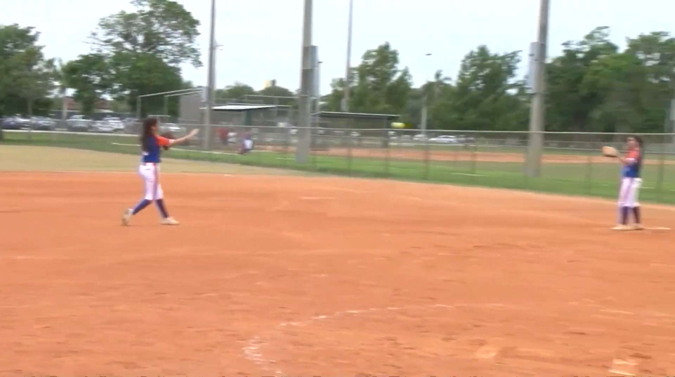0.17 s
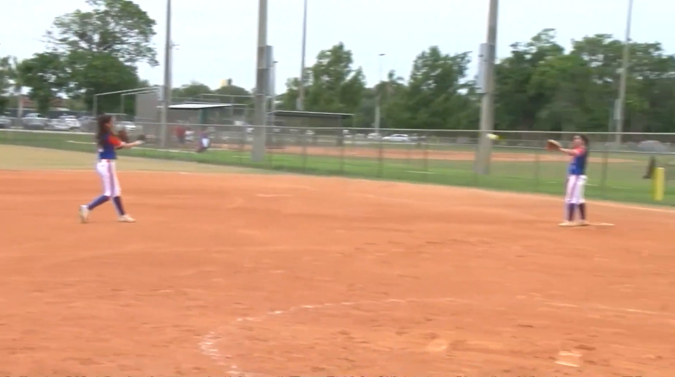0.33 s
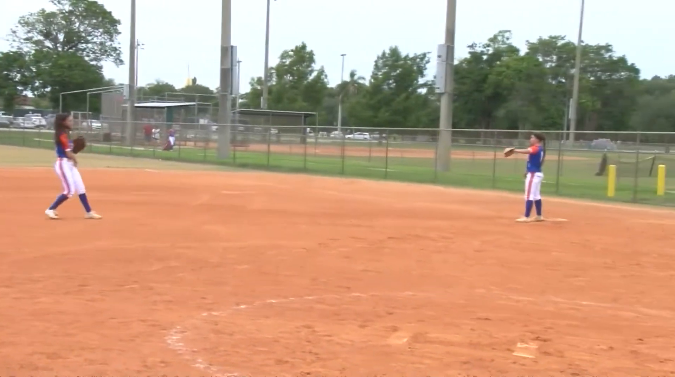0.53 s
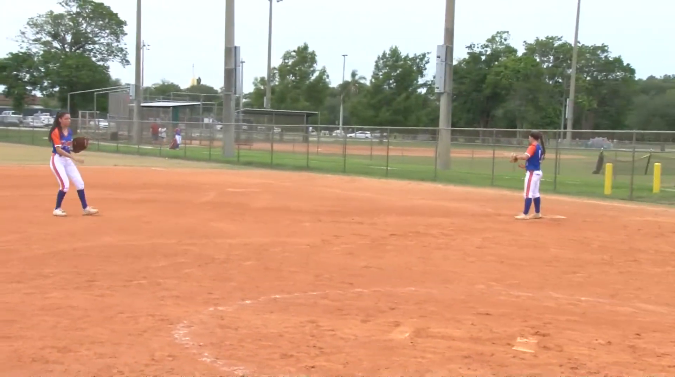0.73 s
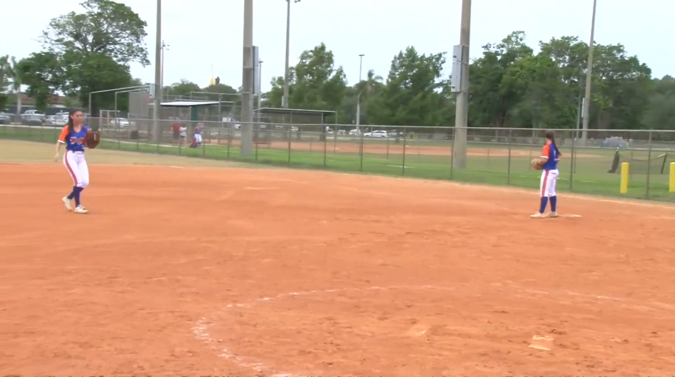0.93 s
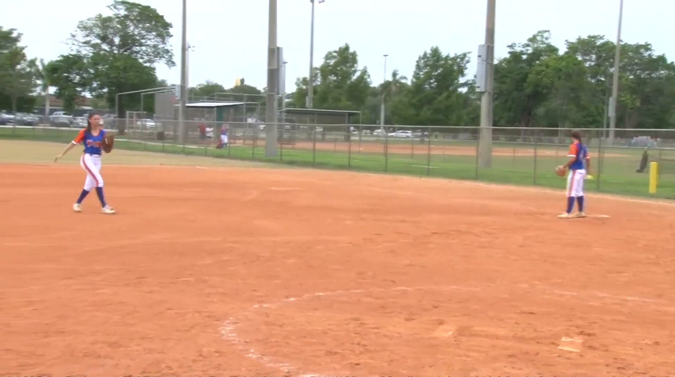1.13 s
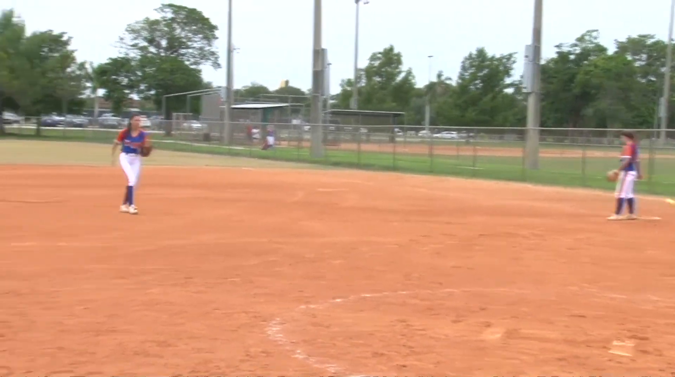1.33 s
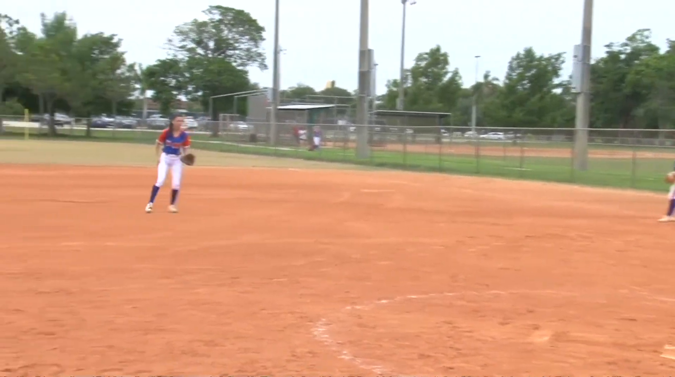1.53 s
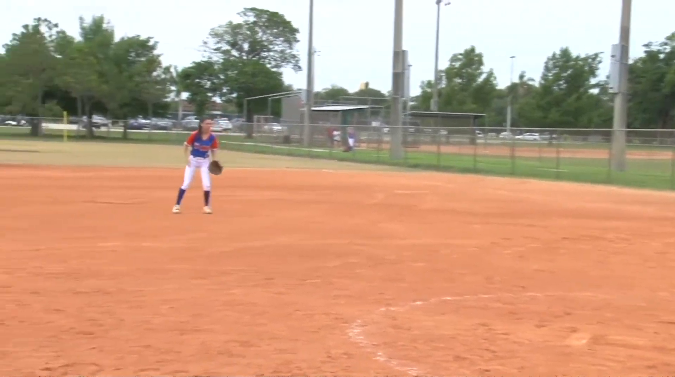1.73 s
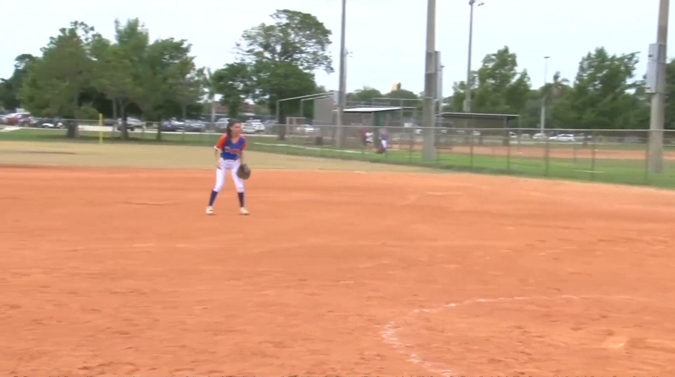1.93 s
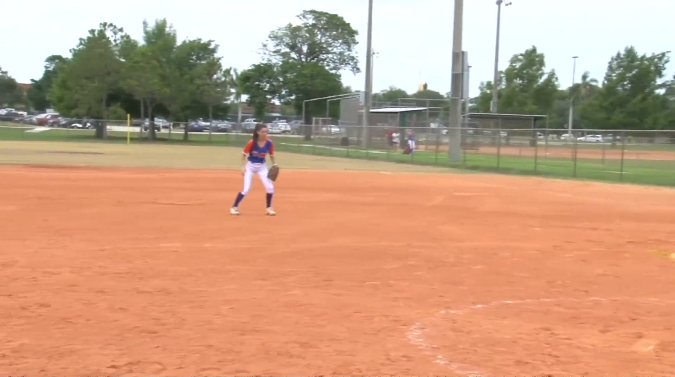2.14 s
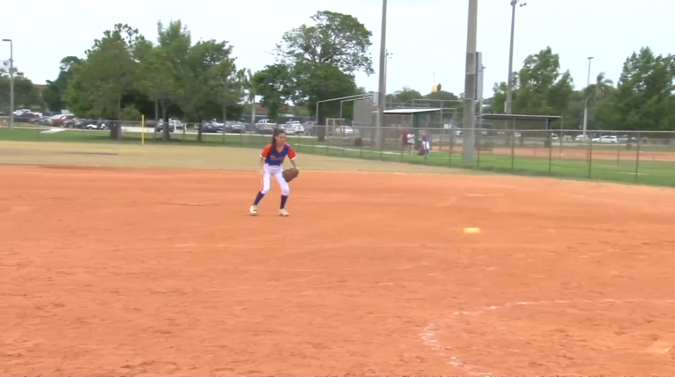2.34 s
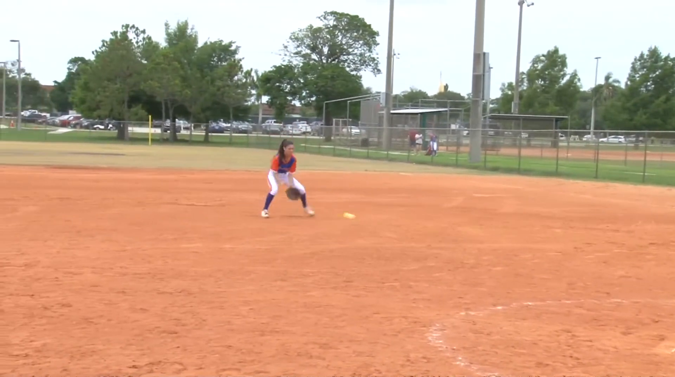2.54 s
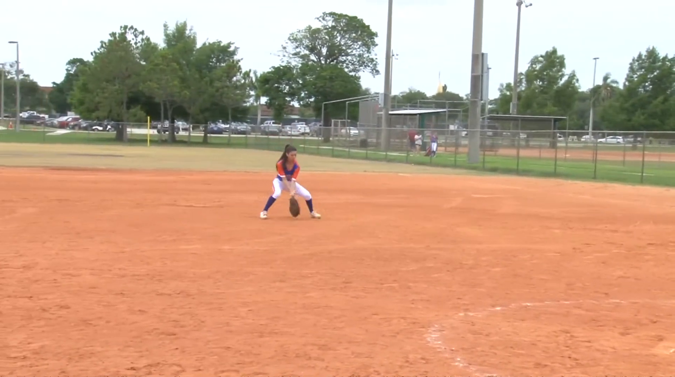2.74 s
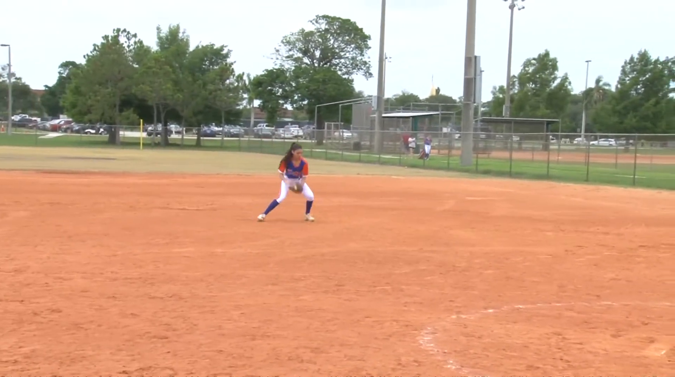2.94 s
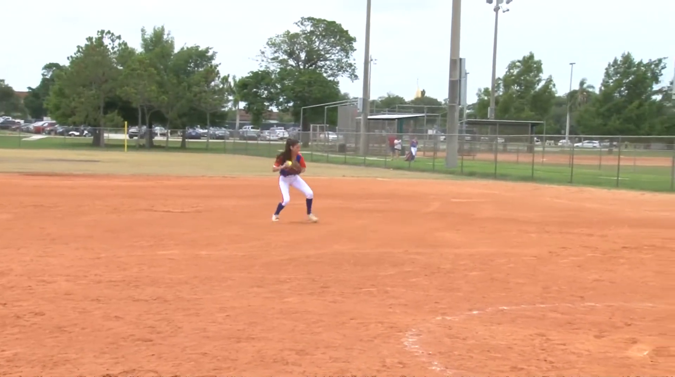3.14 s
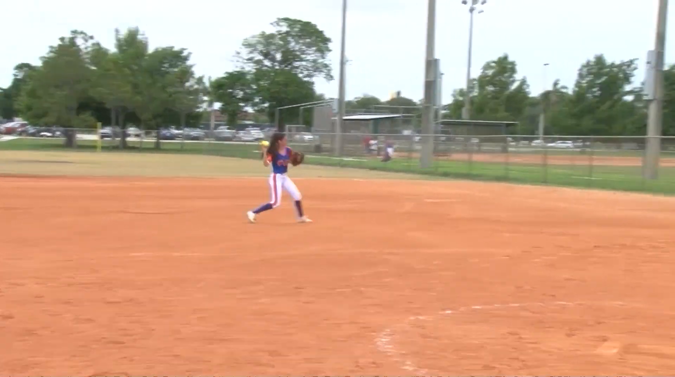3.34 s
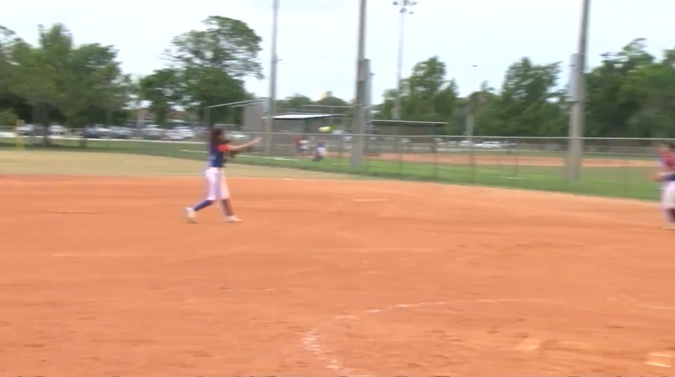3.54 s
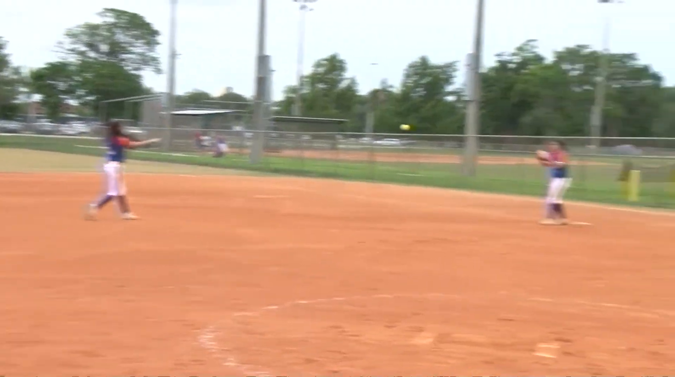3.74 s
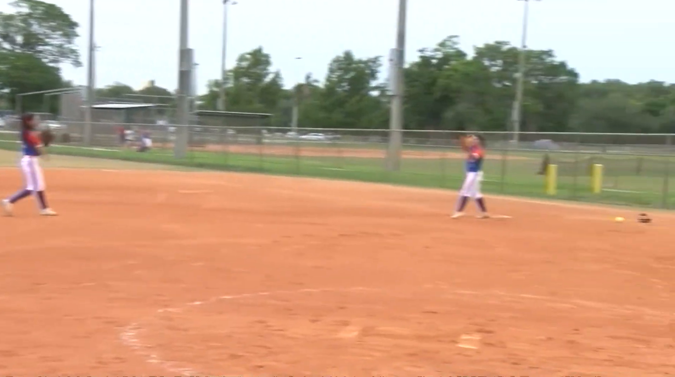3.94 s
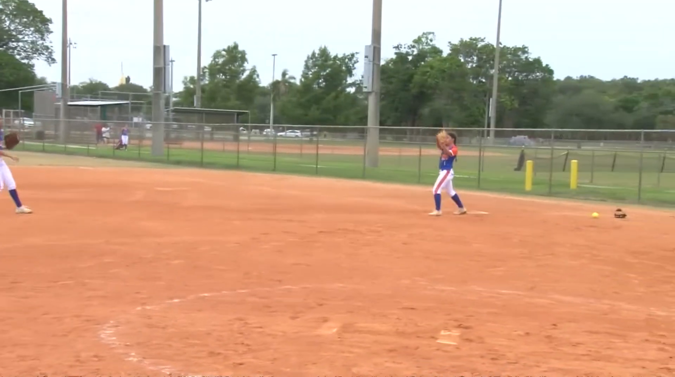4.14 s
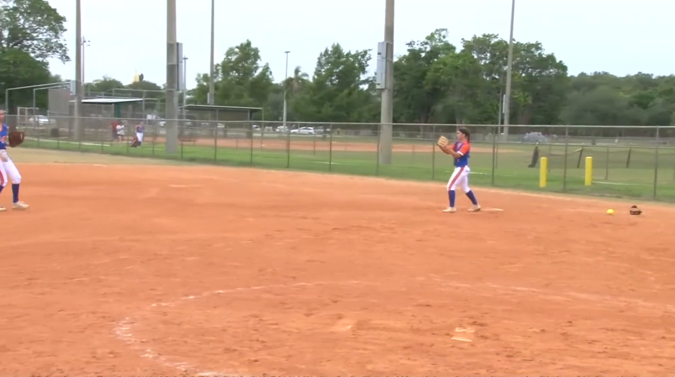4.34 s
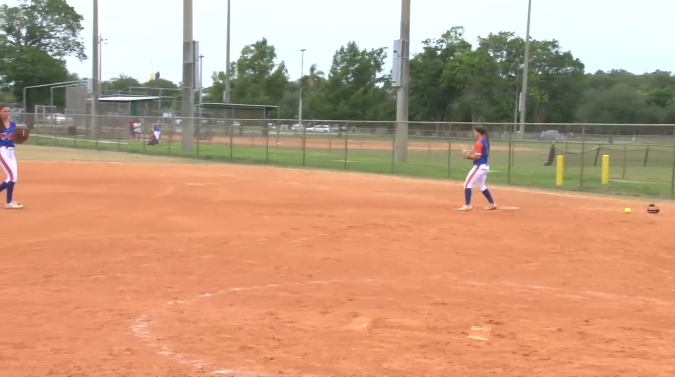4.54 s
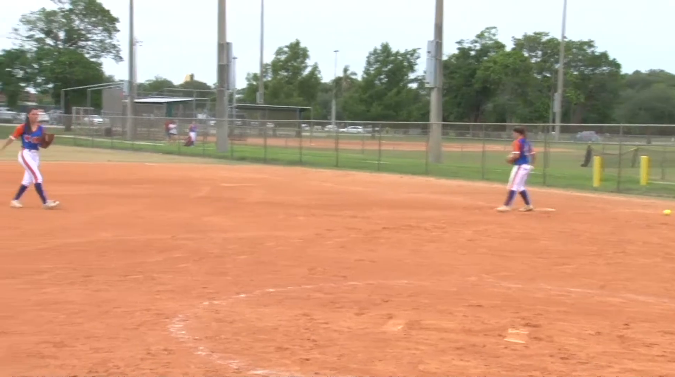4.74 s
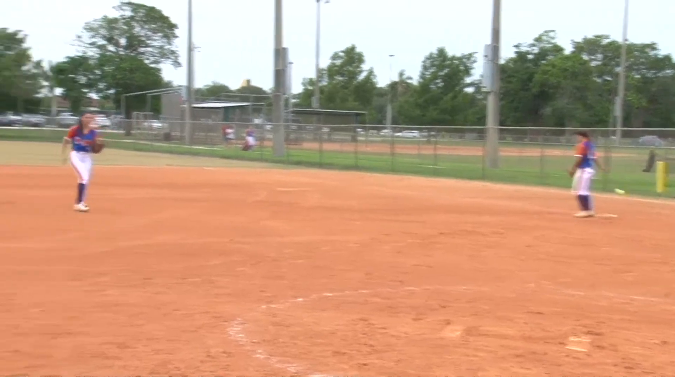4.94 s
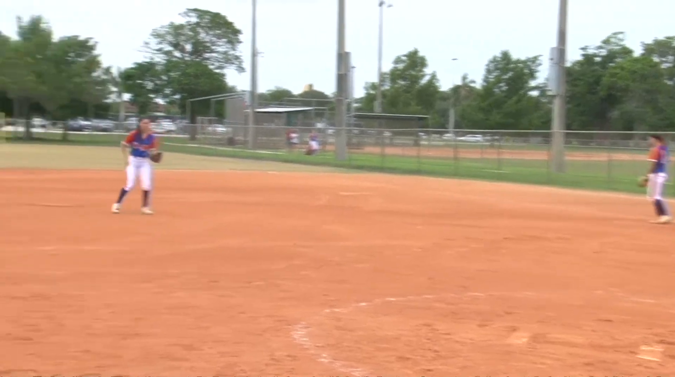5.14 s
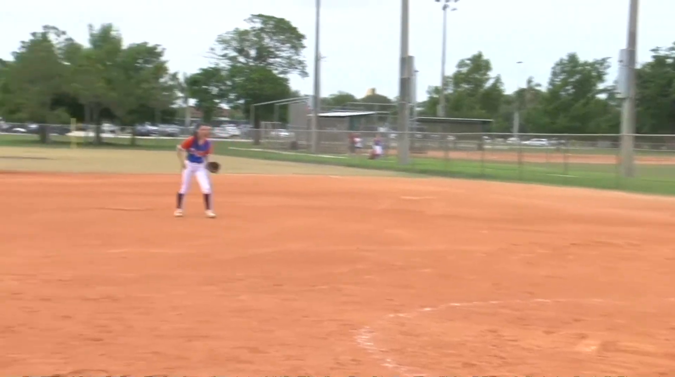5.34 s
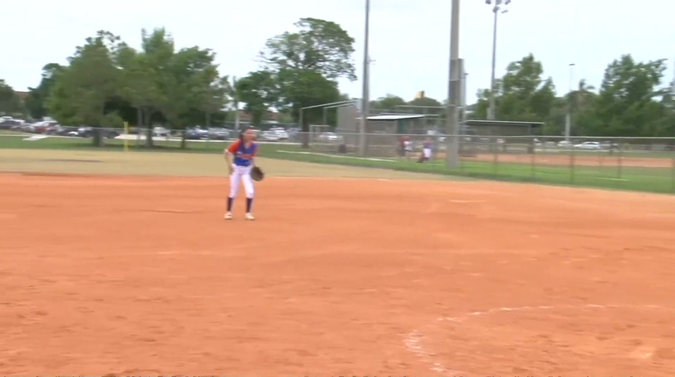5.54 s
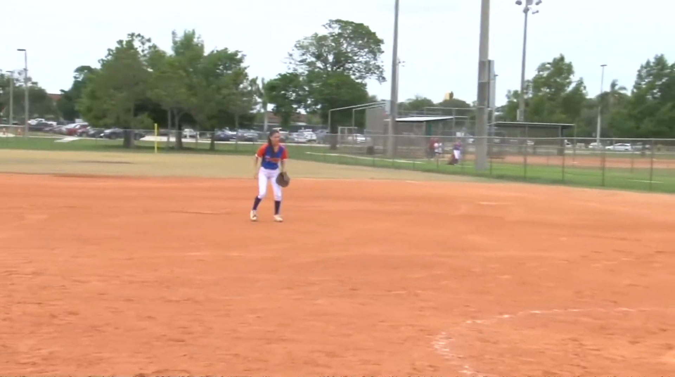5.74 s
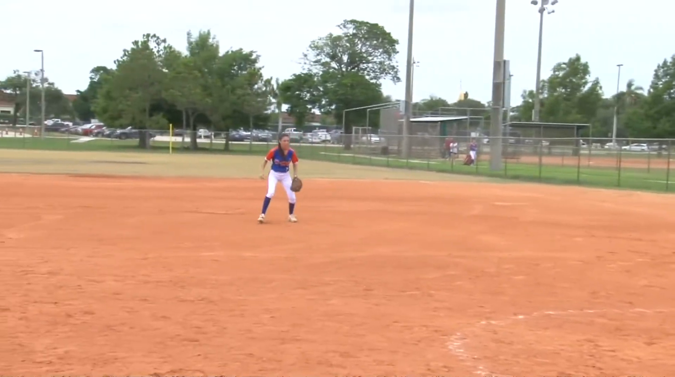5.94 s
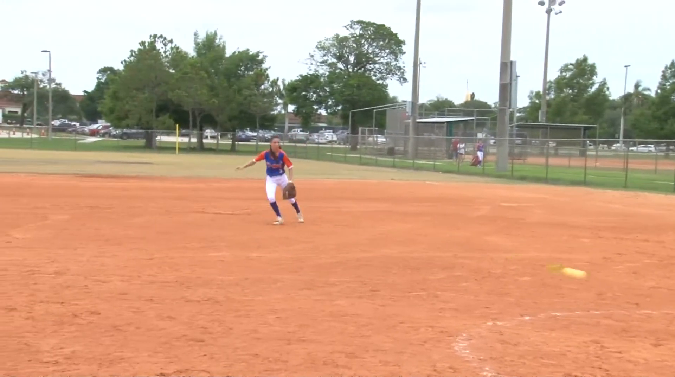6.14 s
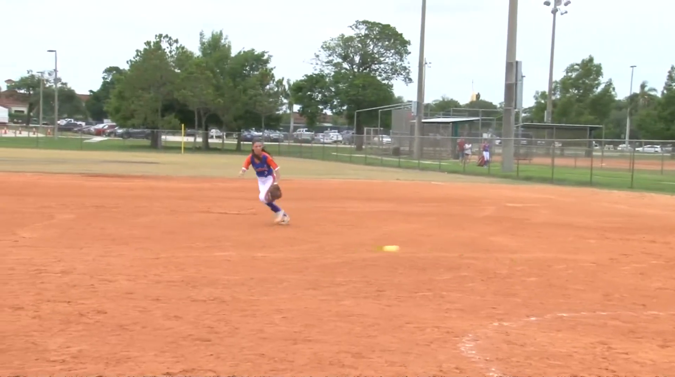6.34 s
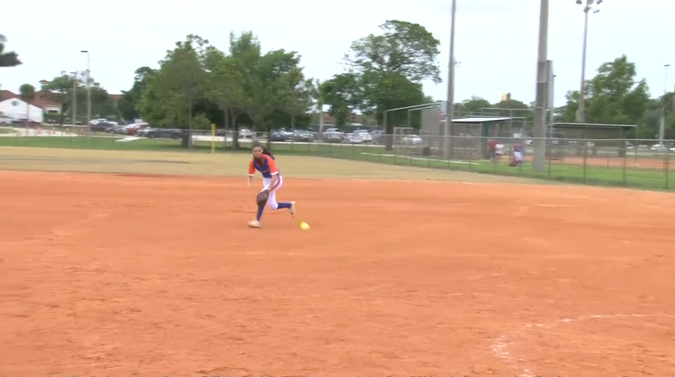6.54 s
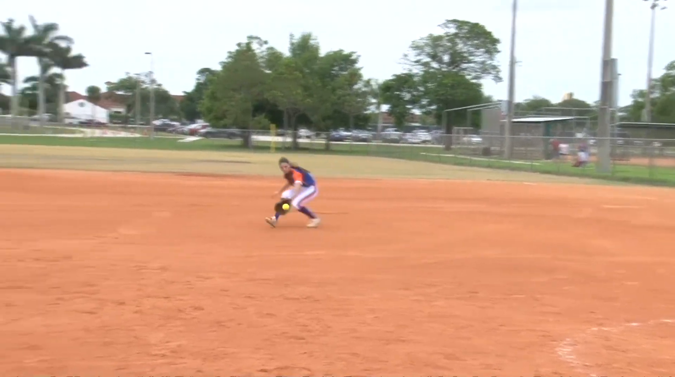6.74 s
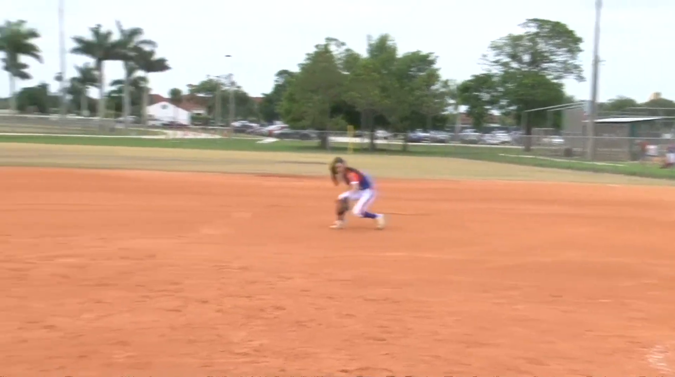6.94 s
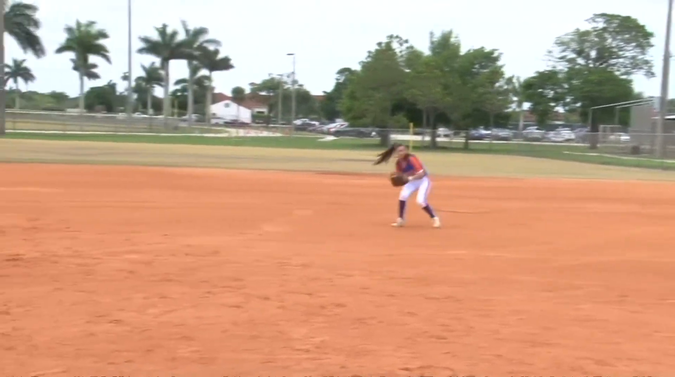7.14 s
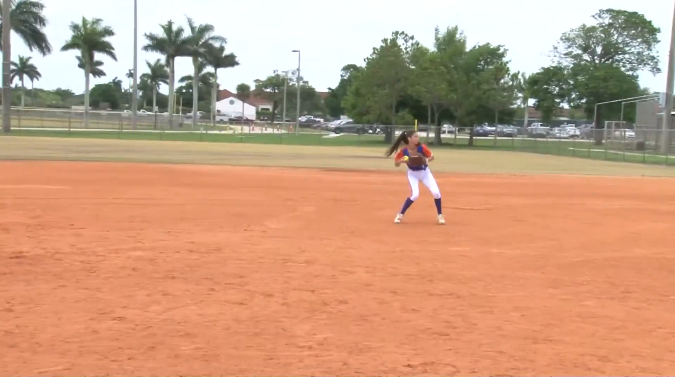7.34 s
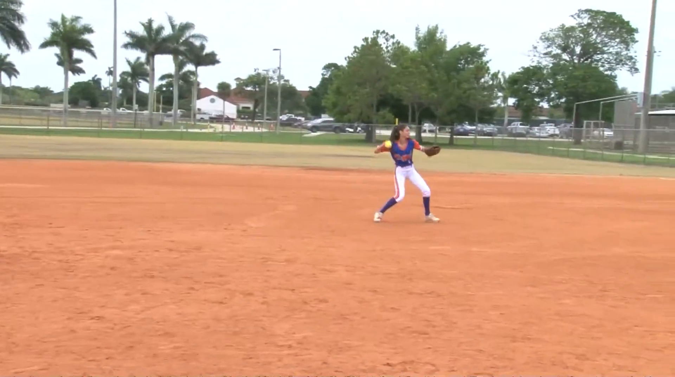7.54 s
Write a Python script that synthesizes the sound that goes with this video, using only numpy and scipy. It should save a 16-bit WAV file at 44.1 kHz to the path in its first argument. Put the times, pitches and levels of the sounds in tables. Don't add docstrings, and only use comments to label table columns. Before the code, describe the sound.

Two bat cracks and smacking glove catches echo lightly across an open ballfield, with bird chirps, soft dirt thuds, traffic hum and gusting wind.

```python
import sys
import numpy as np
from scipy import signal
from scipy.io import wavfile

SR = 44100
rng = np.random.default_rng(int(sys.argv[2]) if len(sys.argv) > 2 else 0)


def elevation(decibels):
    levels = np.asarray(decibels, float)
    return 10 ** (levels / 20)


def master_out(mix):
    frames = np.transpose(np.atleast_2d(mix))
    ceiling = np.clip(frames, -1, 1)
    pcm = np.round(ceiling * 32767).astype(np.int16)
    wavfile.write(sys.argv[1], SR, pcm)


N = 335160


def rms_one(x):
    return x / np.sqrt(np.mean(x ** 2) + 1e-20)


def in_time(rows):
    s, *columns = np.transpose(rows)
    return [np.interp(np.arange(N) / SR, s, c) for c in columns]


def at_hz(points, hz):
    point_hz, value = np.transpose(points)
    return np.interp(np.log(hz), np.log(point_hz), value)


def drift(rate_hz):
    r = np.exp(-80 * np.pi * rate_hz / SR)
    white = rng.standard_normal(N // 40 + 2002)
    slow = signal.lfilter([1], [1, -2 * r, r * r], white)[2000:]
    return np.interp(np.arange(N) / 40, np.arange(len(slow)), rms_one(slow))


def band_pass(x, order, low_hz, high_hz):
    return signal.sosfilt(signal.butter(order, [low_hz, high_hz], "band", fs=SR, output="sos"), x)


def low_pass(x, order, hz):
    return signal.sosfilt(signal.butter(order, hz, fs=SR, output="sos"), x)


def resonate(x, hz, width_hz):
    r = np.exp(-np.pi * width_hz / SR)
    poles = [1, -2 * r * np.cos(2 * np.pi * hz / SR), r * r]
    return signal.lfilter([(1 - r * r) / 2, 0, (r * r - 1) / 2], poles, x)


def ports(x, pan_db, lag_ms):
    n, half_lag = np.arange(len(x)), lag_ms * SR / 2000
    left = elevation(pan_db / 2) * np.interp(n - half_lag, n, x)
    right = elevation(-pan_db / 2) * np.interp(n + half_lag, n, x)
    return np.array([left, right])


def add(out, s, sound):
    i = round(s * SR)
    out[..., i:i + sound.shape[-1]] += sound[..., :N - i]


# (frequency [Hz], common share [0-1])
COHERENCE = [(60, 0.42), (140, 0.62), (300, 0.6), (1000, 0.31), (3000, 0.334), (8000, 0.1)]


def banded_noise(spectrum, patchy_db, lag_ms, shared):
    low_hz, high_hz = spectrum[0][0], spectrum[-2][0]
    edges = np.geomspace(low_hz, high_hz, round(2 * np.log2(high_hz / low_hz)))
    common, diffuse, together = np.zeros(N), np.zeros((2, N)), drift(0.73)
    white = rng.standard_normal((2, 3, N))
    for k, (low, high) in enumerate(zip(edges, edges[1:])):
        band = band_pass(white[k % 2], 2, low, high)
        hz = np.sqrt(low * high)
        alike = np.clip(shared * at_hz(COHERENCE, hz), 0, 1)
        band *= elevation(at_hz(spectrum, hz) + patchy_db * (.5 * together + drift(12.7)))
        common += np.sqrt(alike) * band[0]
        diffuse += np.sqrt(1 - alike) * band[1:]
    return rms_one(ports(common, 0, lag_ms) + diffuse)


# (time [s], level [dB])
CAR_LEVEL = [(0.0, -53), (0.53, -52.5), (1.84, -50), (2.35, -51.5), (2.79, -48), (3.34, -53), (3.94, -51),
             (4.23, -45.5), (5.16, -54), (5.63, -56), (5.99, -48.5), (7.6, -44)]
# (frequency [Hz], density [dB per Hz])
TRAFFIC_SPECTRUM = [(35, -37), (60, -7.5), (135, -2), (176, 2.5), (196, -8), (396, -23.5), (435, -18.5),
                    (1120, -16.5), (2870, -37.5), (3030, -39.5), (3790, -37), (5000, -60.5), (6500, -79),
                    (11000, -120)]
# (frequency [Hz], density [dB per Hz])
CAR_SPECTRUM = [(120, -23), (200, 2), (227, 11.5), (259, 6), (330, -8.5), (540, 5), (2000, -21.5),
                (2600, -44), (4400, -120)]


def road():
    car_db, = in_time(CAR_LEVEL)
    traffic = elevation(-41.5) * banded_noise(TRAFFIC_SPECTRUM, patchy_db=2.0, lag_ms=0.38, shared=1.1)
    car = elevation(car_db) * banded_noise(CAR_SPECTRUM, patchy_db=0.5, lag_ms=0.072, shared=1.24)
    return traffic * elevation(np.array([[-1.0], [1.0]])) + car * elevation(np.array([[2.5], [-2.5]]))


# (time [s], level [dB], left-right difference [dB])
GUSTS = [(0.0, -42, -5), (0.08, -47, 0), (1.18, -50.5, -2.0), (2.82, -44.5, 6), (2.98, -48.5, -2),
         (3.2, -51, -2.5), (5.02, -42.5, 2.5), (5.33, -43.5, -3.5), (5.57, -38.5, 13), (5.69, -38, 5.5),
         (5.92, -38.5, 9.5), (6.1, -39.5, 6.5), (6.45, -42, 11.0), (7.26, -38.5, 9), (7.3, -38.5, 8.5),
         (7.6, -40.5, -1)]
# (frequency [Hz], density [dB per Hz])
WIND_SPECTRUM = [(12, -52), (20, -6), (86, 6), (105, 6.5), (145, 0.5), (231, -34.5), (300, -18.5),
                 (390, -67.5), (660, -120)]


def wind():
    gust_db, pan_db = in_time(GUSTS)
    pan_db = 1.14 * pan_db + 5.5 * drift(5.0)
    lumps = elevation(2.0 * np.array([drift(23), drift(7.7)]))
    rumble = rms_one(lumps * banded_noise(WIND_SPECTRUM, patchy_db=1.0, lag_ms=0, shared=0.3))
    deep = low_pass(rumble, 1, 49.63)
    rumble += deep * (elevation(0.72 * (gust_db - gust_db.mean())) - 1)
    return elevation(gust_db + 1 + np.array([pan_db, -pan_db]) / 2) * rumble


def leaves():
    hiss = band_pass(rng.standard_normal((2, N)), 1, 3500, 6000)
    haze = resonate(resonate(rng.standard_normal((2, N)), 3800, 900), 3800, 900)
    return elevation(-72.0 + 1.2 * drift(1)) * rms_one(hiss) + elevation(-77 + 2.3 * drift(5.1)) * rms_one(haze)


def tone(rows, fade_s):
    hz, db = in_time(rows)
    t = np.arange(N) / SR
    gate = np.clip(np.minimum(t - rows[0][0], rows[-1][0] - t) / fade_s, 0, 1)
    return np.sqrt(2) * elevation(db) * gate * np.sin(2 * np.pi * np.cumsum(hz) / SR)


def chirp(length_s, start_hz, turn_hz, end_hz):
    part = np.arange(round(length_s * SR)) / (length_s * SR)
    hz = np.interp(part, [0, .7, 1], [start_hz, turn_hz, end_hz])
    return np.sqrt(2 * np.sin(np.pi * part)) * np.sin(2 * np.pi * np.cumsum(hz) / SR)


# (time [s], length [s], start pitch [Hz], end pitch [Hz], level [dB])
FALLING_CHIPS = [(.12, 0.042, 4180, 4060, -67), (.31, 0.022, 4120, 3570, -64),
                 (0.914, 0.032, 5000, 4600, -76), (1.452, 0.023, 5400, 4260, -72),
                 (1.551, 0.034, 5440, 4460, -70), (1.662, 0.037, 5300, 3900, -65.5),
                 (3.424, 0.015, 3120, 2840, -59), (4.592, 0.033, 3830, 3550, -61.5),
                 (5.416, 0.072, 3850, 3580, -70), (6.067, 0.025, 3500, 3000, -61),
                 (6.428, 0.077, 3850, 3160, -60.5), (6.85, 0.066, 3750, 3000, -68),
                 (6.904, 0.045, 3010, 2600, -51.5), (7.307, 0.044, 3420, 2670, -60)]
# (time [s], length [s], top pitch [Hz], level [dB rms], faintness of the held head [dB])
SLURRED_WHISTLES = [
    (0.728, 0.29, 3270, -64, 0.5),
    (2.177, 0.31, 3250, -52.5, 9),
    (4.619, 0.302, 3310, -50.5, 23),
    (6.247, .3, 3220, -50.5, 15),
    (7.319, 0.25, 3190, -55.5, 10),
]
SLUR_COURSE = [(0, .97, 1.6), (.15, .99, 1), (.33, 1, 1), (.55, .99, .7), (.72, .955, .2), (.87, .905, 0),
               (1, .88, 1.4)]
# (time [s], chirps [count], gap [s])
DIP_PHRASES = [
    (6.154, 3, .072),
    (6.572, 3, .078),
    (6.988, 3, .08),
    (7.5, 1, .08),
]
# length [s], start pitch [Hz], turning pitch [Hz], end pitch [Hz]
DIP_SWEEP = (.025, 2480, 2050, 2700)


def birds():
    whistles, chips = np.zeros(N), np.zeros(N)
    for s, length, top_hz, db, head_db in SLURRED_WHISTLES:
        rows = [(s + part * length, top_hz * pitch, db - share * head_db) for part, pitch, share in SLUR_COURSE]
        whistles += tone(rows, fade_s=0.014)
    for s, length, start_hz, end_hz, db in FALLING_CHIPS:
        turn_hz = start_hz + 0.7 * (end_hz - start_hz)
        add(chips, s, elevation(db) * chirp(length, start_hz, turn_hz, end_hz))
    out = whistles * elevation(np.clip(5 * drift(40), -14, 4)) + chips * elevation(2.5 * drift(60))
    for s, chirps, gap_s in DIP_PHRASES:
        for k in range(chirps):
            add(out, s + k * gap_s, elevation(-46.5) * chirp(*DIP_SWEEP))
    return ports(out, pan_db=5.5, lag_ms=0.22)


def burst(contact_ms):
    t = np.arange(1800) / SR * 1000 / contact_ms
    return rng.standard_normal(len(t)) * (3.9 * t) ** 2 * np.exp(-6.0 * t)


def blows(rows, contact_ms, snap, thump_late_ms, thump_damping, slap_damping, tip_db):
    # (time [s], peak [dB], thump [Hz], slap [Hz], thump re slap [dB], bright edge re slap [dB])
    out, bare = np.zeros((2, N))
    snap_at = round(contact_ms * SR / 2500)
    for s, db, thump_hz, slap_hz, thump_db, edge_db in rows:
        crackle = burst(contact_ms)
        crackle[snap_at] += snap
        n = np.arange(len(crackle))
        push = np.interp(n - thump_late_ms * SR / 1000, [-1, 0, 1], [0, 1, 0])
        thump = resonate(resonate(push, thump_hz, thump_damping * thump_hz), thump_hz, 1.23 * thump_hz)
        pocket_air = resonate(push, 0.72 * thump_hz, 0.37 * thump_hz)
        thump = rms_one(thump) + elevation(-1.5) * rms_one(pocket_air)
        slap = resonate(resonate(crackle, slap_hz, slap_damping * slap_hz), slap_hz, 0.63 * slap_hz)
        edge = resonate(resonate(crackle, 2620, 2600), 3500, 7900)
        tip = np.diff(n == snap_at, prepend=0.0)
        edge = rms_one(edge) + elevation(tip_db) * rms_one(tip)
        sound = rms_one(slap) + elevation(edge_db) * edge - elevation(thump_db) * rms_one(thump)
        add(out, s, elevation(db) * sound / np.abs(sound).max())
        bare[round(s * SR)] = elevation(db)
    return out, bare


# (time [s], peak [dB], thump [Hz])
DULL_DROPS = [
    (0.497, -37, 251),
    (1.624, -33.5, 340),
    (5.269, -33.5, 305),
    (6.985, -22.5, 398),
]


def drops():
    rows = [(s, db, hz, 620, 13.5, -39) for s, db, hz in DULL_DROPS]
    out, _ = blows(rows, contact_ms=5.0, snap=0.75, thump_late_ms=1.2,
                   thump_damping=0.37, slap_damping=1.0, tip_db=-30)
    return low_pass(out, 2, 1200)


# (time [s], peak [dB], thump [Hz], thump re slap [dB])
GLOVE_RATTLE = [
    (0.6044, -23.5, 405, 1),
    (0.6116, -15, 620, -15),
    (0.6145, -17.5, 344, -7),
    (0.6175, -17, 283, -5.5),
    (0.6238, -33, 300, -10),
]


def juggle():
    rows = [(s, db, hz, 1030, thump_db, -4.5) for s, db, hz, thump_db in GLOVE_RATTLE]
    return blows(rows, contact_ms=3.5, snap=1.0, thump_late_ms=1.91,
                 thump_damping=0.39, slap_damping=0.32, tip_db=-18)


def scatter(x, profile, low_hz, high_hz, air_db_per_s):
    delay, level_db = np.transpose(profile)
    t = np.arange(round(.32 * SR)) / SR
    clumps = elevation(4.2 * np.array([drift(120)[:len(t)], drift(170)[:len(t)]]))
    echoes = rng.standard_normal((2, len(t))) * clumps
    echoes *= elevation(np.interp(t, delay, level_db, -120, -120) - 1.5)
    body = band_pass(echoes, 2, low_hz, high_hz)
    treble = band_pass(echoes * elevation(-16.0 - air_db_per_s * t), 2, high_hz, 9000)
    return signal.fftconvolve(x[None], body + treble, axes=1)[:, :N]


# (time [s], peak [dB], centre [Hz], left-right difference [dB])
CATCH_WALLS = [(0.691, -20.5, 1770, 5.5), (0.709, -29, 890, 3), (2.896, -41, 1500, 1.5),
               (2.938, -33, 915, -5), (2.9756, -27, 616, -9), (4.154, -26.5, 1680, 3),
               (4.167, -37, 2450, -12.5), (4.182, -24, 1470, 4), (4.206, -28, 1820, -8)]
# (time [s], peak [dB], centre [Hz], left-right difference [dB])
CATCH_POSTS = [(0.6634, -35, 5100, -6), (2.9183, -24.5, 4160, -1.5), (2.9264, -37, 4370, 2),
               (2.9756, -28.5, 4860, -4), (4.1254, -46, 3730, 21), (4.1324, -40, 3740, 7)]
# (delay [s], level [dB], centre [Hz], left-right difference [dB])
BLOW_WALLS = [
    (0.0375, -30.5, 1690, -20),
    (0.0493, -25, 1730, -13),
    (.0625, -32, 2650, 16),
    (.081, -24.5, 2000, 14),
    (0.096, -25.5, 1900, 8),
]
# (delay [s], level [dB], centre [Hz], left-right difference [dB])
BLOW_POSTS = [
    (.0016, -49, 3580, 0.26),
    (.124, -51, 4620, 8.5),
    (0.137, -43, 4740, 16),
    (.164, -36, 4330, 3),
    (.18, -53, 4280, 8),
]
BLOW_RETURN_DB = [-2.5, -13]


def walls():
    out = np.zeros((2, N))
    for own, shared, smear_ms in (CATCH_WALLS, BLOW_WALLS, 3.63), (CATCH_POSTS, BLOW_POSTS, 3.0):
        rows = list(own)
        for blow, return_db in zip(BAT_BLOWS, BLOW_RETURN_DB):
            rows += [(blow[0] + late, db + return_db, hz, pan_db) for late, db, hz, pan_db in shared]
        for s, db, hz, pan_db in rows:
            crackle = burst(smear_ms)
            echo = rms_one(resonate(resonate(crackle, hz, .5 * hz), hz, hz))
            echo = echo + elevation(-15) * rms_one(resonate(crackle, 3500, 4500))
            add(out, s, ports(elevation(db) * echo / np.abs(echo).max(), pan_db, lag_ms=0.2))
    return out


# (time [s], pitch [Hz], level [dB], decay by 60 dB [s])
METAL_MODES = [
    (5.802, 1400, -37, 0.2),
    (6.477, 1814, -39.5, 0.29),
    (7.1, 2500, -43, .1),
    (7.1, 2800, -47.5, 0.098),
    (6.49, 5100, -51, 0.07),
    (6.55, 1790, -48, 0.52),
    (0.96, 1100, -50, 0.18),
]


def pings():
    out, t = np.zeros(N), np.arange(SR // 2) / SR
    for s, hz, db, t60 in METAL_MODES:
        swell = 1 - np.exp(-t / .006)
        add(out, s, elevation(db - 60 * t / t60) * swell * np.sin(2 * np.pi * hz * t))
    return ports(out, pan_db=12.5, lag_ms=0.19)


# (time [s], peak [dB], slap [Hz], thump re slap [dB], bright edge re slap [dB])
DIRT_SKIPS = [(0.979, -39, 2930, 1, 6), (0.993, -34, 2520, -4, -9.5), (1.311, -42, 3700, -1, -25),
              (2.147, -34, 2580, 1, 2), (2.158, -21, 3400, 13, 4), (2.634, -29.5, 2780, 18.5, -6.5),
              (6.053, -35.5, 1250, 12, -1), (6.165, -22, 1180, 6, 3), (6.355, -46, 3500, -4, 4),
              (6.37, -45, 3500, 1, -3), (6.624, -29, 1300, 11, -1), (7.12, -39.5, 1250, 8, -5),
              (7.56, -36, 600, 13, -16.5)]


def skips():
    rows = []
    for s, db, *rest in DIRT_SKIPS:
        thump_hz = 244 + 8.5 * max(db + 32, 0)
        rows.append((s, db, thump_hz, *rest))
    out, _ = blows(rows, contact_ms=5.9, snap=0.97, thump_late_ms=2.2,
                   thump_damping=0.4, slap_damping=0.47, tip_db=-6)
    return out


# (time [s], peak [dB], thump [Hz], slap [Hz], bright edge re slap [dB])
BAT_BLOWS = [
    (1.8858, -4, 630, 1680, -23),
    (5.7914, -4.5, 850, 2300, -6),
]


def bat():
    rows = [(s, db, hz, slap_hz, -3, edge_db) for s, db, hz, slap_hz, edge_db in BAT_BLOWS]
    rows += [(s - 0.0011, db - 21, hz, slap_hz, -6, edge_db) for s, db, hz, slap_hz, edge_db in BAT_BLOWS]
    return blows(rows, contact_ms=2.47, snap=1.1, thump_late_ms=0.867,
                 thump_damping=0.33, slap_damping=0.31, tip_db=-6)


# (time [s], pitch [Hz], level [dB rms])
INSECT_LINE = [(2.17, 3750, -59), (2.32, 3750, -61), (2.42, 3750, -72), (2.52, 3750, -61),
               (2.83, 3755, -56), (3.1, 3755, -60), (3.7, 3740, -60), (4.25, 3730, -58), (4.47, 3720, -65)]


def insect():
    throb = elevation(np.clip(4 * drift(20) + 4 * drift(120), -12, 5))
    return ports(tone(INSECT_LINE, fade_s=0.029) * throb, pan_db=0.0, lag_ms=0.37)


# (time [s], peak [dB], thump [Hz], slap [Hz], thump re slap [dB])
CATCHES = [
    (2.8613, -0.5, 477, 3100, 1.5),
    (4.1145, -3.5, 297, 2330, -5.5),
]


def glove():
    rows = [(*row, -11) for row in CATCHES]
    rows += [(s - 0.0022, db - 21, hz, slap_hz, -15, 0.0) for s, db, hz, slap_hz, _ in CATCHES]
    return blows(rows, contact_ms=3.064, snap=1.9, thump_late_ms=1.793,
                 thump_damping=0.45, slap_damping=1.0, tip_db=-11)


# (time [s], peak [dB], thump [Hz], slap [Hz], bright edge re slap [dB])
FUMBLE = [
    (6.9532, -12.5, 790, 2180, -5.5),
    (6.9546, -16, 564, 3030, -1),
    (6.9563, -12.5, 430, 2650, -11),
]


def scoop():
    rows = [(s, db, hz, slap_hz, 3.05, edge_db) for s, db, hz, slap_hz, edge_db in FUMBLE]
    out, snap = blows(rows, contact_ms=3.2, snap=1.0, thump_late_ms=1.9,
                      thump_damping=0.6, slap_damping=0.79, tip_db=-25)
    snap[round(FUMBLE[0][0] * SR) + 1:] = 0
    return out, snap


def off_ground(x, late_ms, db):
    n = np.arange(N)
    return x + elevation(db) * np.interp(n - late_ms * SR / 1000, n, x)


# (delay [s], level [dB])
BLOW_SCATTER = [(.004, -29), (.03, -37), (0.04, -29), (0.058, -27), (0.071, -30), (0.09, -24), (.115, -31),
                (.2, -43), (0.301, -46.5)]
# (delay [s], level [dB])
CATCH_SCATTER = [(.004, -20), (.012, -41.5), (0.03, -58), (0.045, -33.5), (.08, -37.5), (0.113, -35.5),
                 (.13, -59), (.25, -96)]


def scene():
    juggled, juggle_snap = juggle()
    batted, bat_snap = bat()
    caught, catch_snap = glove()
    scooped, scoop_snap = scoop()
    direct = ports(off_ground(batted, late_ms=1.227, db=-6), pan_db=5.5, lag_ms=-0.085)
    direct += ports(off_ground(caught + scooped, late_ms=2.3, db=-19), pan_db=7.5, lag_ms=0.099)
    direct += ports(juggled, pan_db=6.5, lag_ms=0.082)
    direct += ports(skips() + drops(), pan_db=11.0, lag_ms=0.044)
    direct[1] = low_pass(direct[1], 2, 7500)
    echoes = scatter(bat_snap, BLOW_SCATTER, 670, 3770, air_db_per_s=46.0) + walls()
    echoes += scatter(catch_snap + scoop_snap + juggle_snap, CATCH_SCATTER, 1170, 4000, air_db_per_s=44.0)
    return road() + wind() + leaves() + birds() + direct + echoes + pings() + insect()


def top_cut(x):
    return signal.sosfilt(signal.butter(12, 16120, fs=SR, output="sos"), x)


def record(dry):
    dull = low_pass(dry, 2, 9000)
    mix = np.clip(dull, -1, 1)
    return top_cut(mix)


dry = scene()
out = record(dry)
master_out(out)
```